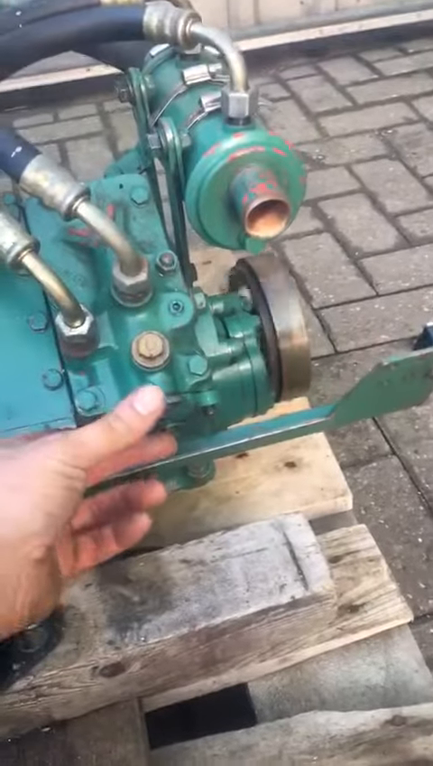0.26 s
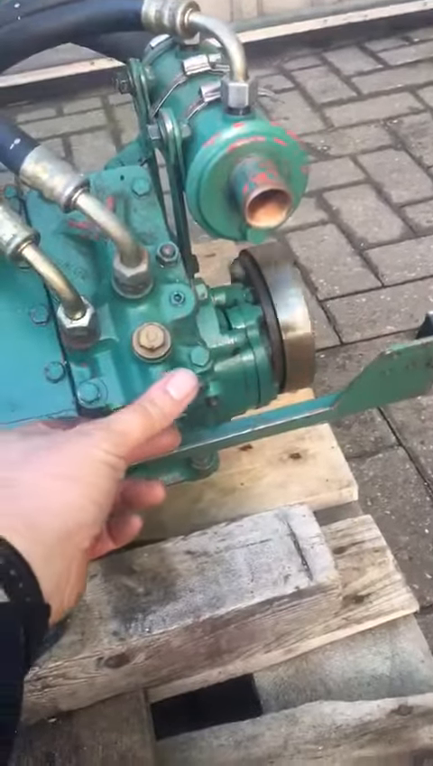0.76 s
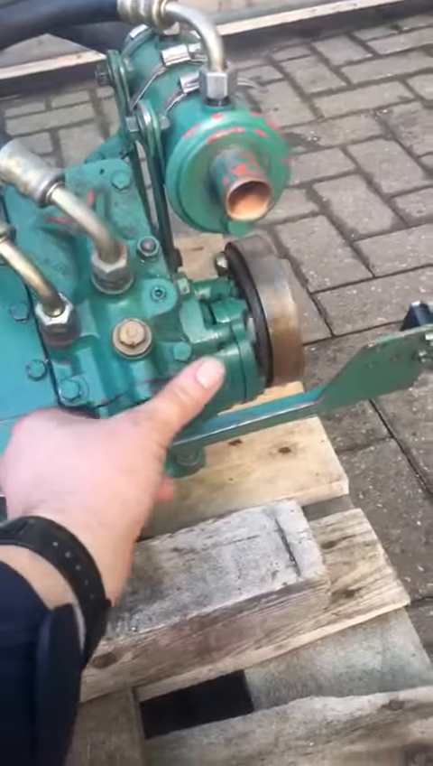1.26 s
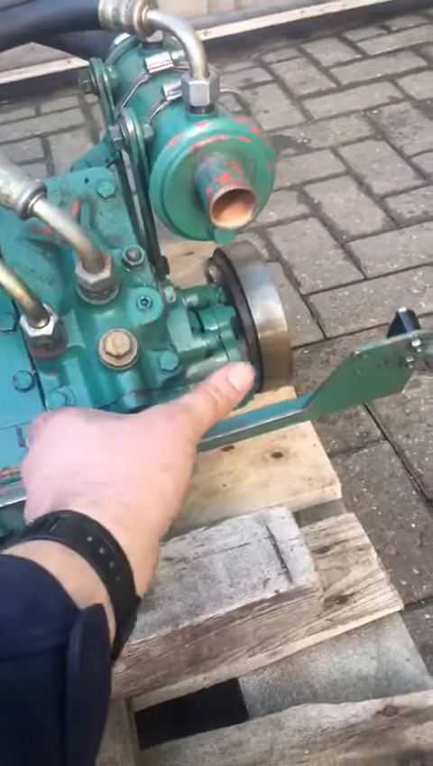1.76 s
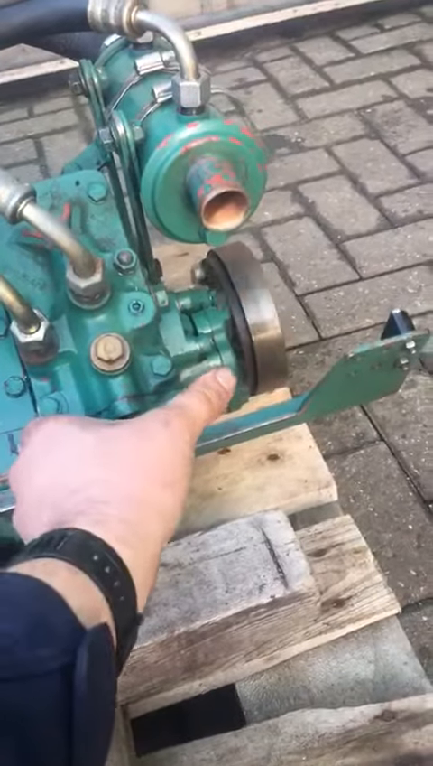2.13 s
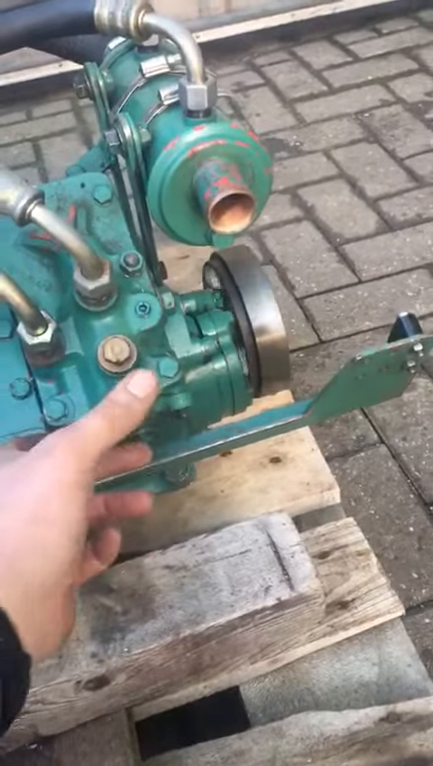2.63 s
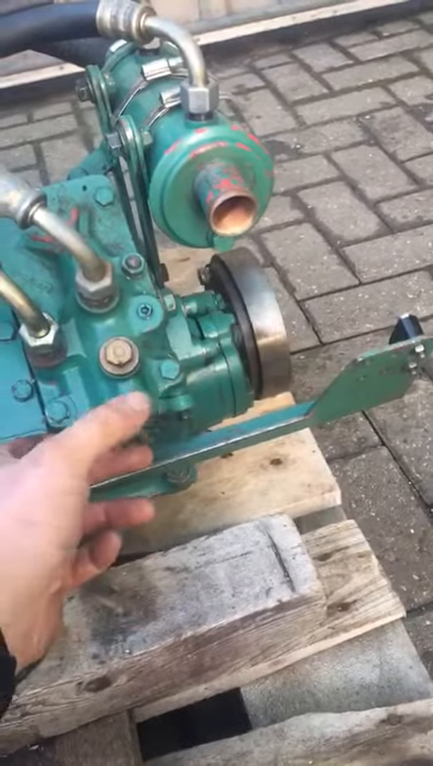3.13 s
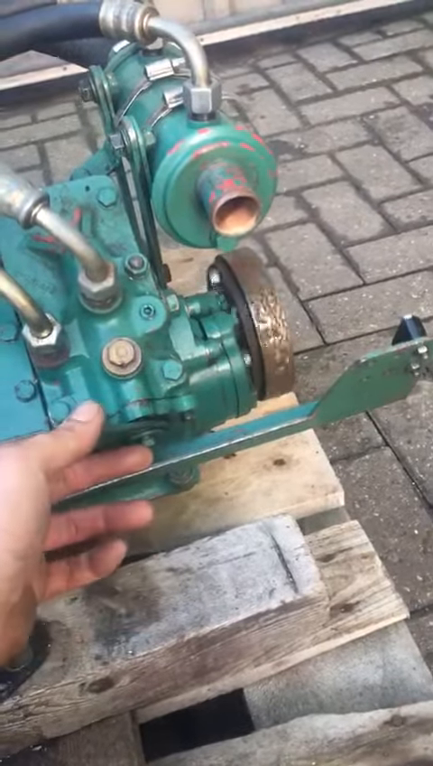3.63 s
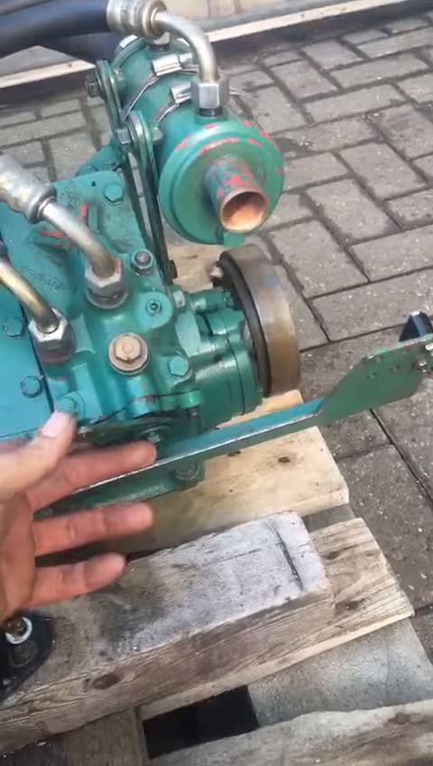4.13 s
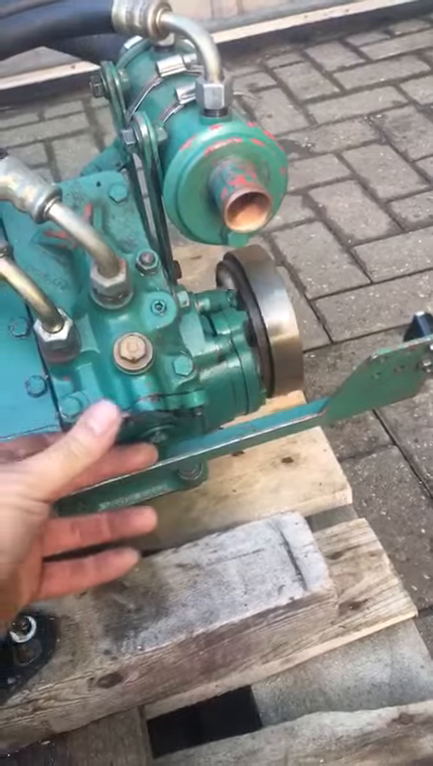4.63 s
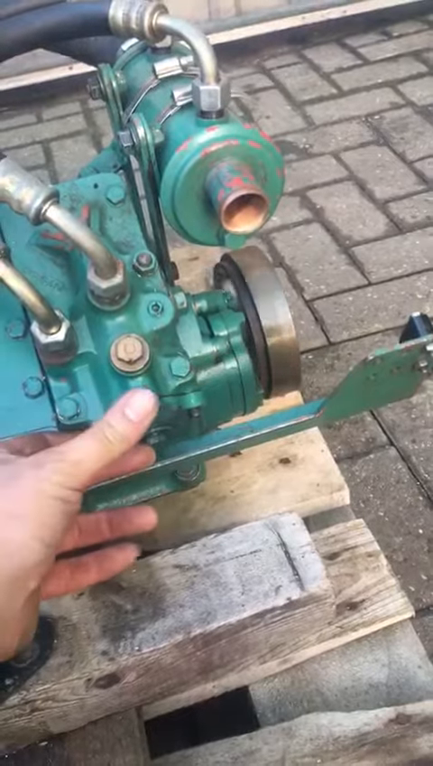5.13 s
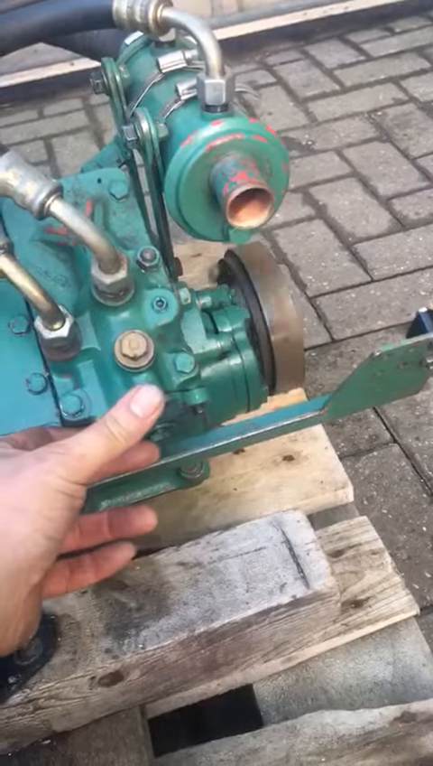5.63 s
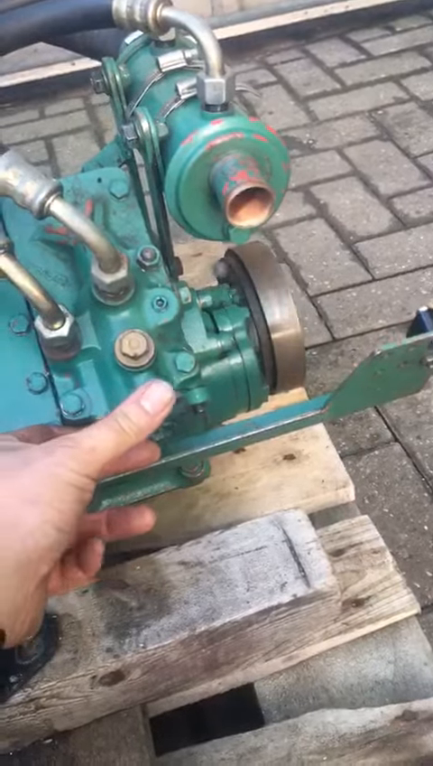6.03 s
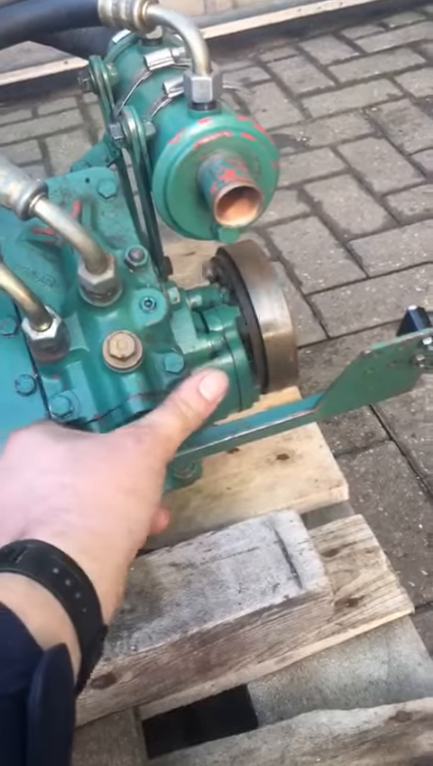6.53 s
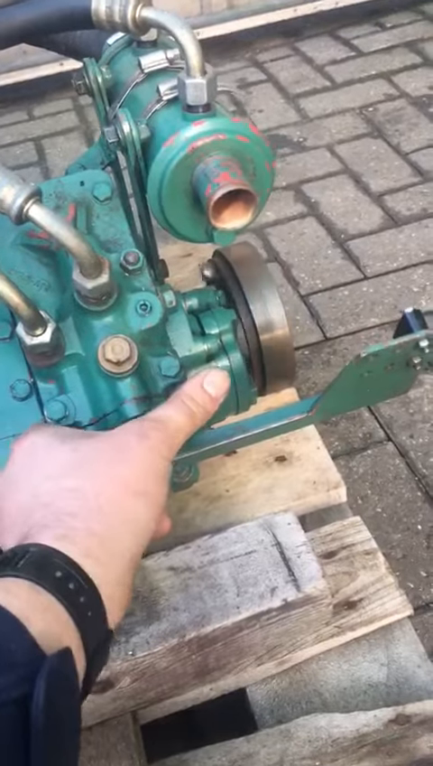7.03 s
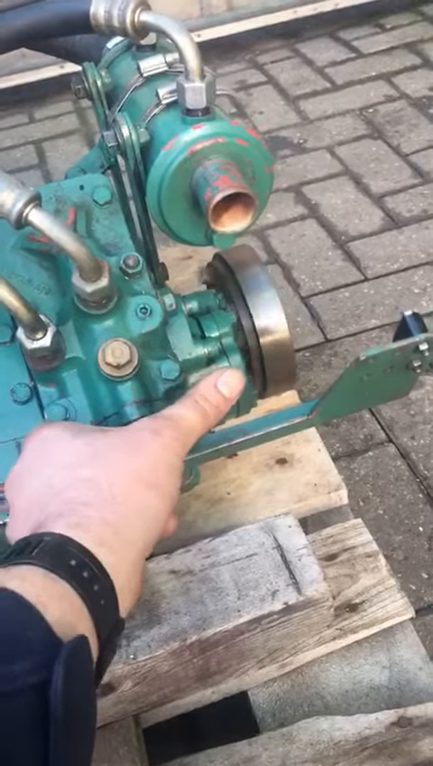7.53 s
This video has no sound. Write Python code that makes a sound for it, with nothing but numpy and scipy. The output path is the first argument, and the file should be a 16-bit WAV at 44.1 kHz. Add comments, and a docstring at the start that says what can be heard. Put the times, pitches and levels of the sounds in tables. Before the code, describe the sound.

A diesel boat engine ticks over with a steady throb, knock and gear rattle, sagging briefly under load and recovering.

```python
"""A four-cylinder marine diesel idles on a pallet in a paved yard, heard from beside its gearbox.
Exhaust puffs throb in the pipe over a churn of bearings, belt and valve gear.
Every firing rattles the gears and knocks the block; valves tick faintly in between.
Two loads come on, with a brief light one between: the speed sags, the gears clack harder,
and the governor recovers."""
import sys
import numpy as np
from scipy import signal
from scipy.fft import rfft, irfft, next_fast_len
from scipy.io import wavfile
from scipy.ndimage import map_coordinates

SR = 44100
rng = np.random.default_rng(int(sys.argv[2]) if len(sys.argv) > 2 else 0)


def transcribe(u):
    """Save the signal u as a 16-bit wav file named by the first command-line argument.

    u: samples, shape (n,) or (channels, n), limited to [-1, 1]; the rate is SR.
    q: integer samples, one column per channel.
    """
    v = np.clip(np.atleast_2d(u).T, -1, 1)
    q = np.round(v * 32767).astype(np.int16)
    wavfile.write(sys.argv[1], SR, q)


N = 342657

# Cylinders in firing order. Each row: rattle lead in s, rattle level in dB, knock delay after the
# rattle in s, knock level in dB, wall ring in Hz, ring level in dB. Levels are relative.
CYLINDERS = [(0.0093, 1, 0.0063, 5.5, 1240, -9.5), (0.0095, -2.5, 0.0073, 1.5, 964, -0.5),
             (0.00895, 0.43, 0.00317, 2.5, 617, -2), (0.0089, -1.3, 0.003545, 4, 1053, 1.5)]


def amp(db):
    """Decibels to gain."""
    return 10 ** (np.asarray(db) / 20)


def unit(x):
    """Scale to rms 1."""
    return x / np.sqrt(np.mean(x ** 2) + 1e-20)


def wobble(knots_per_s):
    """Smooth random curve."""
    knots = rng.standard_normal(int(N * knots_per_s / SR) + 4)
    coarse = np.arange(0, N, 64)
    return np.interp(np.arange(N), coarse, map_coordinates(knots, [coarse * knots_per_s / SR]))


def filtered(x, response):
    """Apply a complex frequency response."""
    size = next_fast_len(N + SR // 4, real=True)
    return irfft(rfft(x, size) * response(np.fft.rfftfreq(size, 1 / SR)), size)[:N]


def coloured(x, points):
    """Shape x by (Hz, dB) points on a log axis."""
    hz, db = np.transpose(points)
    return filtered(x, lambda f: amp(np.interp(np.log(f + 1), np.log(hz), db)))


def resonance(f, hz, width_hz):
    """Causal response of one damped mode."""
    return 1j * f * width_hz / (hz * hz - f * f + 1j * f * width_hz)


def casting(drive, modes, vary_db):
    """Blows ring a casting, each sharing its force differently among the modes; rms 1."""
    ring = np.zeros(N)
    for k, (hz, width_hz, db) in enumerate(modes):
        share = drive * amp(vary_db * wobble(20))
        ring += (-1) ** k * amp(db) * filtered(share, lambda f: resonance(f, hz, width_hz))
    return unit(ring)


def blows(times_s, levels_db):
    """One impulse at each time."""
    return np.bincount(np.clip(times_s * SR, 0, N - 1).astype(int), amp(levels_db), N)


def contacts(times_s, levels_db, rise_s, tail_s, tail_db, grains_per_s):
    """Each blow is a flurry of tiny contacts that swells and chatters out."""
    t = np.arange(SR // 10) / SR
    swell = (t / rise_s) ** 2 * np.exp(2 - 2 * t / rise_s)
    chatter = amp(tail_db) * (1 - np.exp(-t / rise_s)) * np.exp(-t / tail_s)
    grains = unit(rng.standard_normal(N) * (rng.random(N) < grains_per_s / SR))
    return signal.fftconvolve(blows(times_s, levels_db), swell + chatter)[:N] * grains


def crank_times(firings, places):
    """Seconds at which the crank passes each place, in firings; steady speed beyond both ends."""
    period_s = N / SR / firings[-1]
    inside = np.clip(places, 0, firings[-1])
    return np.interp(inside, firings, np.arange(N) / SR) + (places - inside) * period_s


def clack_db(times_s):
    """Extra rattle and knock level where a firing slams the gears across their play."""
    # Each row: time in s, extra rattle in dB, extra knock in dB.
    clacks = [(.358, 3, 1.5), (1.087, 3.5, 2.5), (1.57, 8, 6.5), (1.61, 3, -1), (1.878, 5.5, 3.5),
              (2.257, 2, 0), (2.294, 0.5, 2.5), (2.743, 1.5, 0.5), (3.109, 3, -2), (3.477, 1.5, 3.5),
              (4.714, 1.5, 2), (6.733, 7.5, 1.5), (7.155, 1, 2)]
    clack_s, *extra_db = np.transpose(clacks)
    return np.array(extra_db) @ (abs(clack_s[:, None] - times_s) < .018)


def glides(firings, rows, skew, power, scatter_db, detune):
    """Once a cycle each row's tone swells, rises and dies; skew under 1 brings its peak forward."""
    out = np.zeros(N + 2 * SR)
    cycles = np.arange(-1, firings[-1] / len(CYLINDERS) + 1) * len(CYLINDERS)
    for place, length_s, start_hz, end_hz, db in rows:
        u = np.arange(int(length_s * SR)) / (length_s * SR)
        swell = np.sin(np.pi * u ** skew) ** power
        turns = np.cumsum(start_hz + (end_hz - start_hz) * u) / SR
        times_s = crank_times(firings, cycles + place)
        chance = rng.standard_normal((len(times_s), 2))
        for start_s, knock_db, (size, pitch) in zip(times_s, clack_db(times_s)[1], chance):
            gain = amp(db + 0.6 * knock_db + scatter_db * size)
            tone = np.sin(2 * np.pi * turns * (1 + detune * pitch))
            out[round((start_s + 1) * SR):][:len(u)] += gain * swell * tone
    return out[SR:][:N]


def exhaust(firings, rpm):
    """Cylinder and pipe boom at each stroke, rising in pitch as the piston shrinks the volume."""
    # Each row: place in the cycle in firings, length in s, start in Hz, end in Hz, level in dB.
    strokes = [(-.281, .105, 62.3, 222, -10), (.755, .098, 72.7, 215.6, -8.1),
               (1.775, .083, 75.4, 237.8, -9.4), (2.759, .098, 71.6, 211.5, -8.7)]
    # Hollow hoots that make the cycle lope, stronger under load. Same columns.
    hoot_glides = [(-.287, 0.0441, 184, 287.7, -22), (0.73, 0.0224, 189.6, 253.5, -22),
                   (2.9, 0.045, 243.4, 280.5, -25.5), (3.088, 0.0406, 286, 410.5, -32),
                   (1.009, 0.026, 282, 317, -32), (2.564, 0.0266, 158, 225, -26)]
    # Radiation from the pipe's mouth. Each row: frequency in Hz, gain in dB.
    mouth = [(15, -25), (29, -18), (46, 10), (56, 2.5), (75, 0), (110, -0.05), (150, 0.5), (195, 0),
             (240, 0.5)]
    sag_fraction = 1 - rpm / np.max(rpm)
    puffs = glides(firings, strokes, skew=.44, power=4.8, scatter_db=.3, detune=.004)
    hoots = glides(firings, hoot_glides, skew=.96, power=.78, scatter_db=.5, detune=.0091)
    return coloured(amp(0.3) * puffs + amp(-0.5 + 29 * sag_fraction) * hoots, mouth)


def churn():
    """Bearings, belt and valve gear fill the gaps between firings with noise."""
    # Each row: frequency in Hz, relative density in dB.
    spectrum = [(20, -11), (45, 4), (110, 1), (170, 9.5), (250, 3), (400, -0.5), (620, 2), (780, -3.5),
                (1000, -1), (1850, -7), (2400, -8.5), (4200, -15), (6600, -15.5), (8000, -19),
                (11500, -23.5)]
    return amp(-28.5 + 1.1 * wobble(60)) * unit(coloured(rng.standard_normal(N), spectrum))


def gear_rattle(times_s, levels_db, valves):
    """Gear teeth chatter across their play; they and the valve ticks ring the gear case."""
    # Each row: frequency in Hz, width in Hz, relative level in dB.
    case_modes = [(1060, 108, 2.5), (1495, 135, -2.5), (2064, 166, 4), (2473, 152, 2), (3210, 303, -2.5),
                  (4686, 260, -2), (5407, 430, -1.5), (6188, 330, 3.5), (6155, 227, 2.5), (6790, 690, -1.5),
                  (8830, 610, -3.5), (9430, 800, -5.5), (11090, 710, -7)]
    teeth = contacts(times_s, levels_db, rise_s=.0035, tail_s=.008, tail_db=5, grains_per_s=7000)
    return amp(-26.5) * casting(teeth + valves, case_modes, vary_db=1.88)


def block_knock(times_s, levels_db):
    """Combustion and piston slap ring the block."""
    # Each row: frequency in Hz, width in Hz, relative level in dB.
    block_modes = [(339, 56, -0.5), (459, 41, 0.5), (574, 36, 5), (653, 67, 0), (962, 33, 3),
                   (1078, 25, -1.5), (1240, 55, 3), (1360, 69, -5), (1500, 81, -0.5), (1712, 36, -2.5),
                   (2290, 290, -4), (2387, 44, 1.5), (2520, 80, -10.5)]
    slaps = contacts(times_s, levels_db, rise_s=.0037, tail_s=.017, tail_db=-5.5, grains_per_s=4000)
    return amp(-30.5) * casting(slaps, block_modes, vary_db=1.5)


def wall_ring(times_s, levels_db, cylinder):
    """Each piston rings its own stretch of wall."""
    walls = np.zeros(N)
    for k, (*_, ring_hz, ring_db) in enumerate(CYLINDERS):
        slaps = blows(times_s[cylinder == k], levels_db[cylinder == k])
        ring = filtered(slaps, lambda f: resonance(f, ring_hz, width_hz=73) ** 2)
        walls += amp(ring_db) * unit(ring)
    return amp(-41) * walls


def valve_ticks(times_s, levels_db):
    """Valves seat with a short tick."""
    return contacts(times_s, levels_db, rise_s=.0008, tail_s=.0067, tail_db=-18, grains_per_s=4000)


def clatter(firings, strain_rpm):
    """Each firing jerks the gears, then knocks; strain hardens the rattle and eases the knock a little."""
    # Rattle gain in dB per rpm of strain, by cylinder in firing order.
    rattle_db_per_rpm = [.1, 0.044, 0.072, .055]
    knock_db_per_rpm = -0.02
    count = np.arange(1, int(firings[-1]) + 1)
    cylinder = count % len(CYLINDERS)
    at = np.searchsorted(firings, count)
    lead_s, rattle_db, delay_s, knock_db = np.array(CYLINDERS)[cylinder, :4].T
    chance = rng.standard_normal((6, len(count)))
    wander_db = wobble(3.07)[at]

    rattle_s = crank_times(firings, count) - lead_s + .00036 * chance[0]
    knock_s = rattle_s + delay_s + .00066 * chance[1]
    valve_s = crank_times(firings, count + .474) + .0014 * chance[2]
    extra_rattle_db, extra_knock_db = clack_db(rattle_s)
    rattle_db += np.array(rattle_db_per_rpm)[cylinder] * strain_rpm[at]
    rattle_db += extra_rattle_db + wander_db + .5 * chance[3]
    knock_db += knock_db_per_rpm * strain_rpm[at]
    knock_db += extra_knock_db + .5 * wander_db + .5 * chance[4]

    valves = valve_ticks(valve_s, levels_db=-19.8 + 2 * chance[5])
    gears = gear_rattle(rattle_s, rattle_db, valves)
    return gears + block_knock(knock_s, knock_db) + wall_ring(knock_s, knock_db, cylinder)


def yard(x, rt60_s=0.25):
    """Paving and walls add a short, weak scatter."""
    t = np.arange(SR // 4) / SR
    tail = rng.standard_normal(len(t)) * amp(-60 * t / rt60_s) * (t > .005)
    return x + amp(-15.5) * signal.fftconvolve(x, tail / np.linalg.norm(tail))[:N]


def load_sag(t, onset_s=0.1):
    """Loads drag the speed below idle until the governor wins it back; in rpm."""
    # Each row: start in s, sag in rpm, hold in s, recovery in s.
    loads = [(1.355, 43.4, .415, 1.13), (3.735, 27.1, .025, .23), (6.495, 66.2, .345, .95)]
    sag_rpm = np.zeros(N)
    for start_s, depth_rpm, hold_s, recovery_s in loads:
        corners_s = start_s + np.cumsum([0, onset_s, hold_s, recovery_s])
        sag_rpm += depth_rpm * np.interp(t, corners_s, [0, 1, 1, 0])
    return sag_rpm


def strain(sag_rpm, lag_s=0.58):
    """Lagged sag: hard blows build up and linger after the speed has dropped."""
    pole = np.exp(-1 / (lag_s * SR))
    return signal.lfilter([1 - pole], [1, -pole], sag_rpm)


def scene():
    """The crankshaft times exhaust and clatter: two firings a turn."""
    # The idle creeps up. Each row: time in s, unloaded speed in rpm.
    idle = [(0, 822.2), (3.5, 823.4), (6.5, 843.1)]
    t = np.arange(N) / SR
    sag_rpm = load_sag(t)
    rpm = np.interp(t, *np.transpose(idle)) - sag_rpm
    firings = np.cumsum(2 * rpm / 60) / SR
    return (exhaust(firings, rpm) + yard(clatter(firings, strain(sag_rpm))) + churn())[None]


def record(dry):
    """Soft clip at full scale, then a steep low-pass."""
    top_hz = 11850
    rounded = dry[0] / (1 + dry[0] ** 8) ** (1 / 8)
    return filtered(rounded, lambda f: 1 / np.sqrt(1 + (f / top_hz) ** 140))[None]


dry = scene()
out = record(dry)
transcribe(out)
```